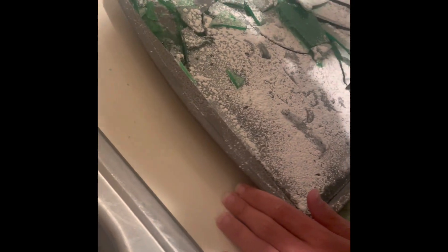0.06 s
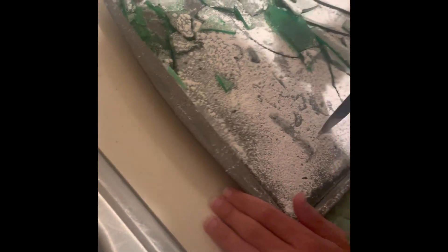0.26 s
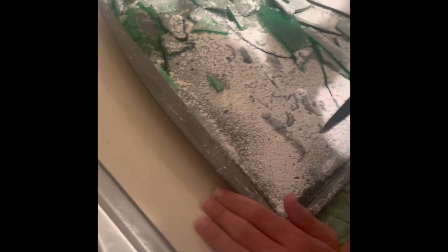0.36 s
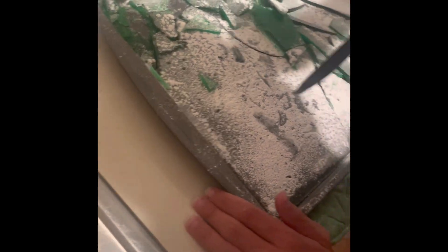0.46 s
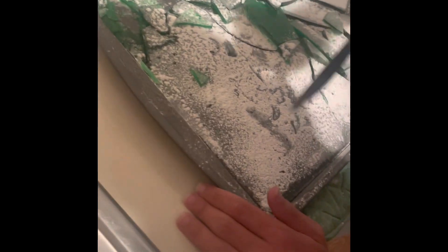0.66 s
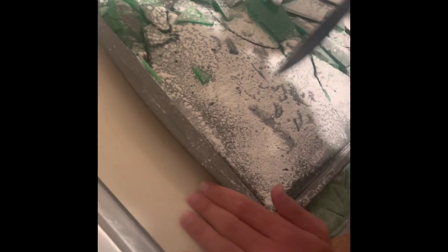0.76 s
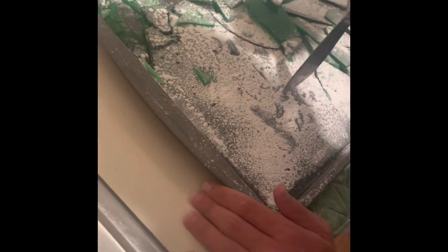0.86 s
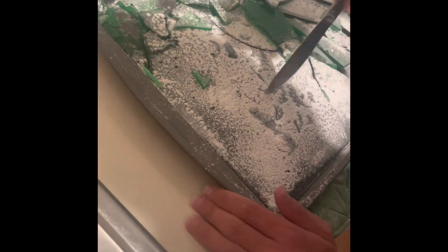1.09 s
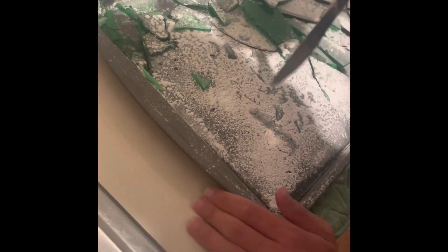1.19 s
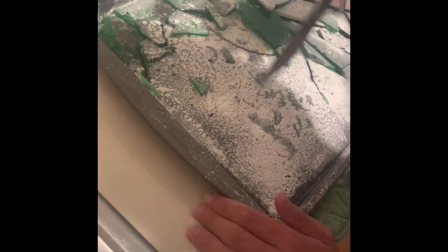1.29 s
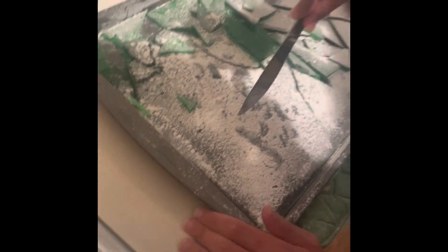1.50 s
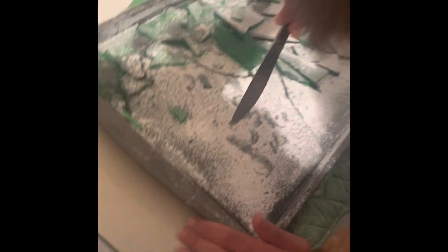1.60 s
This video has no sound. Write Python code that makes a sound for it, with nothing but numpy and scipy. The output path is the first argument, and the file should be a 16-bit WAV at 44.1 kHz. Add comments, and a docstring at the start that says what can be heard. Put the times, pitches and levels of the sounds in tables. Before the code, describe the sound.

A knife tip cracks hard candy in a metal pan with five sharp, crunchy taps

```python
"""A knife tip taps five times on a sheet of hard candy in a metal baking pan, close to a two-port microphone.
Each tap is a set of decaying sine modes (candy, pan, blade) under grainy noise for the crack and the crunch of
shards. The pan drops back on the counter with a low pressure swing, and the counter and tray rumble as noise.
A small kitchen answers with decaying noise, over low rumble, hum lines and faint hiss; a limiter flattens peaks.
"""
import sys
import numpy as np
from scipy import signal
from scipy.fft import rfft, irfft
from scipy.io import wavfile
from scipy.ndimage import uniform_filter1d, minimum_filter1d

SR = 44100
rng = np.random.default_rng(int(sys.argv[2]) if len(sys.argv) > 2 else 0)


def output_pcm(signal):
    """Save a mono or channel-first signal as 16-bit PCM at the path in sys.argv[1].

    Samples are clipped to [-1, 1] before scaling.
    """
    pcm = np.clip(np.atleast_2d(signal).T, -1, 1) * 32767
    wavfile.write(sys.argv[1], SR, np.round(pcm).astype(np.int16))


N = 72765

# Candy mode decays: (low mode t60 [s], main mode t60 [s])
CANDY_T60_S = (0.058, 0.022)
# Pan modes: (frequency [Hz], level [dB], t60 [s])
PAN_MODES = [(952, -11.5, 0.08), (1488, -17, 0.044), (1634, -12, 0.045), (1861, -8, 0.026),
             (2264, -18, 0.15), (3704, -19.5, 0.07), (3943, -5.5, 0.023), (4434, -16.5, 0.075),
             (5442, -18.5, 0.079), (6216, -5.5, 0.078), (9455, -21, 0.11), (10220, -18.5, 0.046)]
# Crack spectrum: (frequency [Hz], density [dB per Hz])
CRACK_SPECTRUM = [(350, -17.5), (750, -29.5), (1120, 2), (1900, -11.5), (2350, 7), (2830, -5.5), (3350, -7),
                  (4100, -18.5), (4750, -6), (5480, -14.5), (6400, -11), (7600, -14.5), (10000, -8.5),
                  (13500, -20), (15600, -15), (16800, -40)]
# Crunch spectrum, also used for loose shards: (frequency [Hz], density [dB per Hz])
CRUNCH_SPECTRUM = [(300, -25), (520, -2), (750, -17.5), (1120, 1.5), (1500, -6.5), (1900, -7.5), (2350, -1),
                   (2830, 1), (3350, -19.5), (3920, -3.5), (4700, -15.5), (5480, -10), (6000, -11),
                   (7700, -36), (10000, -17), (13000, -20), (16800, -43)]
TAP_DB, TAP_RISE_S, LOW_RISE_S = -10.5, 0.0015, 0.008
BLADE_HZ, BLADE_T60_S = 2827, 0.028
CRACK_DB, CRACK_T60_S = -2, 0.035
SCATTER_DB, DETUNE = 2.0, 0.01  # random spread of mode level and relative pitch


def tap(level_db, low_hz, low_db, main_hz, main_db, blade_db, contact_s, treble_db, crunch_db, crunch_t60_s):
    """Candy, pan and blade modes hold while the blade bears on the sheet, then die; crack and crunch lie over."""
    t = np.arange(SR // 4) / SR
    free_t = np.maximum(t - contact_s, 0)
    candy_mode = (main_hz, main_db, CANDY_T60_S[1])
    blade_mode = (BLADE_HZ, blade_db, BLADE_T60_S)
    modes = np.array(PAN_MODES + [candy_mode, blade_mode])
    chance = rng.uniform(-1.03, 1, (len(modes), 3))
    quadrature = np.array([[0], [np.pi / 2]])

    low_env = amp(low_db - 60 * free_t / CANDY_T60_S[0]) * np.minimum(t / LOW_RISE_S, 1) ** 2
    out = low_env * np.sin(2 * np.pi * low_hz * t + quadrature)
    for (hz, db, t60_s), (level_chance, pitch_chance, phase_chance) in zip(modes, chance):
        mode_db = db + treble_db * np.log2(hz / 1000) / 2 + SCATTER_DB * level_chance
        mode_hz = hz * (1 + DETUNE * pitch_chance)
        phase = np.pi * phase_chance + quadrature
        out += amp(mode_db - 60 * free_t / t60_s) * np.sin(2 * np.pi * mode_hz * t + phase)

    out += amp(CRACK_DB + treble_db) * crack(free_t, CRACK_T60_S, CRACK_SPECTRUM)
    out += amp(crunch_db) * crack(t, crunch_t60_s, CRUNCH_SPECTRUM)
    return amp(TAP_DB + level_db) * np.minimum(t / TAP_RISE_S, 1) * out


GRAINS_PER_S, SPREAD_DB = 5000, 3


def crack(t, t60_s, spectrum):
    """A dense random spray of tiny fractures, of uneven size, gates coloured noise that dies away."""
    size = amp(SPREAD_DB * np.minimum(rng.exponential(1, len(t)), 4))
    grains = size * (rng.random(len(t)) < GRAINS_PER_S / SR)
    density = evened(uniform_filter1d(grains, size=40) + 0.02)
    return amp(-60 * t / t60_s) * density * noise(spectrum, len(t))


# Loose shards and crumbs: (time [s], level [dB], rise [s], t60 [s])
SHARDS = [(0.271, -31.5, 0.018, 0.15), (.5245, -14, .001, .03), (.797, -23, 0.00048, 0.017),
          (0.803, -23.5, 0.00067, 0.059), (.83, -33.5, 0.017, 0.077), (1.070, -27, 0.0039, .03),
          (1.309, -24, 0.0064, 0.025), (1.321, -29, 0.0012, 0.032), (1.469, -48, 0.012, .1)]


def add_shards(mix):
    """Each loose shard is a short crunch: linear rise, then exponential decay."""
    t = np.arange(SR // 8) / SR
    for s, db, rise_s, t60_s in SHARDS:
        grit = crack(np.maximum(t - rise_s, 0), t60_s, CRUNCH_SPECTRUM)
        add(mix, s, amp(db) * np.minimum(t / rise_s, 1) * grit)


THUD_HALF_S = 0.05


def thud(level_db, hz, length_s):
    """A few swings of low pressure under a bell, centred on the landing, with no net push."""
    t = np.arange(-THUD_HALF_S, THUD_HALF_S, 1 / SR)
    bell = np.exp(-0.5 * (t / length_s) ** 2)
    offset = np.exp(-0.5 * (2 * np.pi * hz * length_s) ** 2)
    return -amp(level_db) * bell * (np.cos(2 * np.pi * hz * t) - offset)


# Counter spectrum: (frequency [Hz], density [dB per Hz])
COUNTER_SPECTRUM = [(35, -10), (60, 8), (90, -1.5), (130, 5), (170, -1.5), (230, -2.5), (300, -7.5),
                    (450, -30)]
# Close tray tones: (lower [Hz], upper [Hz])
TRAY_HZ = (205, 230.3)
BOOM_RISE_S, BOOM_T60_S, TRAY_T60_S = 0.04, 0.63, 0.74


def boom(counter_db, tray_db):
    """Counter swells after the tap and rumbles on as low noise; tray hums in two narrow noise bands."""
    t = np.arange(SR // 2) / SR
    tray = sum(noise([(hz - 10, -14), (hz, 0), (hz + 10, -14)], len(t)) for hz in TRAY_HZ)
    counter = amp(counter_db - 60 * t / BOOM_T60_S) * noise(COUNTER_SPECTRUM, len(t))
    both = counter + amp(tray_db - 60 * t / TRAY_T60_S) * tray
    return np.minimum(t / BOOM_RISE_S, 1) ** 2 * both


# Room decay before each tap's span factor: (frequency [Hz], t60 [s])
ROOM_DECAY = [(300, 0.57), (700, 0.38), (1800, 0.5), (2830, 0.43), (4800, 0.34), (9000, 0.35),
              (15000, 0.14)]
# Room spectrum: (frequency [Hz], density [dB per Hz])
ROOM_SPECTRUM = [(180, -31), (300, -7), (730, -7.5), (1530, -15), (2170, -17.5), (2840, -21.5), (3530, -15),
                 (6140, -13.5), (7020, -35), (7890, -92), (8300, -24), (11400, -22), (13000, -37.5),
                 (13700, -82.5), (16500, -71.5)]
# Lingering pan ring, t60 before the span factor: (frequency [Hz], width [Hz], level [dB], t60 [s])
PAN_RING = [(1160, 80, -19, 0.46), (1890, 100, -17.5, .4), (2850, 140, -4.5, 0.39), (3864, 120, -16, .45),
            (4350, 120, -21, 0.18), (5520, 120, -17, 0.37), (6470, 150, -17, .4)]
PATCH_DB, ROOM_RISE_S = 3.0, 0.0082


def room_tail(room_db, span, extra_ring_db):
    """Two patchy noise tails, each band dying at its own speed, with the pan ringing on unsteadily."""
    hz, t, bins = signal.stft(noise(ROOM_SPECTRUM, SR // 2), SR, nperseg=256)
    patches = uniform_filter1d(rng.standard_normal(bins.shape[1:]), size=4, axis=0)
    patches = evened(uniform_filter1d(patches, size=5, axis=1))
    decay_db = -60 * t / (span * read(ROOM_DECAY, hz)[:, None])
    tail = signal.istft(bins * amp(PATCH_DB * patches + decay_db), SR, nperseg=256)[1]

    t = np.arange(tail.shape[1]) / SR
    for ring_hz, width_hz, ring_db, t60_s in PAN_RING:
        band = [(ring_hz - 2 * width_hz, -20), (ring_hz, 0), (ring_hz + 2 * width_hz, -20)]
        tail = tail + amp(ring_db + extra_ring_db - 60 * t / (span * t60_s)) * noise(band, len(t))
    return amp(room_db) * tail * np.minimum(t / ROOM_RISE_S, 1)


# Rumble spectrum: (frequency [Hz], density [dB per Hz])
RUMBLE_SPECTRUM = [(20, -21), (50, -8.5), (110, 1.5), (160, -7), (300, -16), (500, -19.5), (1000, -30.5),
                   (2000, -43.5), (4000, -54)]
# Hum lines, before the port tilt: (frequency [Hz], level [dB rms])
HUM_LINES = [(118.4, -64.5), (204.6, -63), (279.9, -61.5)]
# Treble hiss spectrum: (frequency [Hz], density [dB per Hz])
HISS_SPECTRUM = [(880, -71.5), (1500, -36), (2700, -17), (3750, -30), (4520, -21), (6950, -33),
                 (7490, -43.5), (12300, -34), (14000, -62.5)]
# Hiss level: (time [s], level [dB])
HISS_LEVEL = [(0, -100), (.2, -60), (.3, -70.5), (.7, -63.5), (1., -66), (1.3, -54), (1.65, -60.5)]
RUMBLE_DB = -53.5


def kitchen():
    """Low noise rumble, steady hum sines and a faint hiss of varying level."""
    t = np.arange(N) / SR
    hum = sum(amp(db) * np.sqrt(2) * np.sin(2 * np.pi * hz * t) for hz, db in HUM_LINES)
    hiss = amp(np.interp(t, *np.transpose(HISS_LEVEL))) * noise(HISS_SPECTRUM, N)
    rumble = amp(RUMBLE_DB) * noise(RUMBLE_SPECTRUM, N)
    return rumble + hiss + hum * [[1], [0]]  # hum feeds the first signal only


def amp(db):
    """Decibels to amplitude ratio."""
    return 10 ** (np.asarray(db) / 20)


def evened(x):
    """Scale to rms 1."""
    return x / np.sqrt(np.mean(x ** 2) + 1e-20)


def read(points, hz):
    """Interpolate a table over log frequency."""
    point_hz, value = np.transpose(points)
    return np.interp(np.log(hz + 1), np.log(point_hz + 1), value)


def add(mix, s, sound):
    """Mix a sound in at s seconds, cut at the end of the mix."""
    part = mix[..., round(s * SR):][..., :sound.shape[-1]]
    part += sound[..., :part.shape[-1]]


def noise(spectrum, size):
    """Two unrelated noises with the given spectrum, silent outside its end points, rms 1."""
    hz = np.fft.rfftfreq(size, 1 / SR)
    in_band = (hz >= spectrum[0][0]) & (hz <= spectrum[-1][0])
    white = rfft(rng.standard_normal((2, size)))
    return evened(irfft(white * amp(read(spectrum, hz)) * in_band, size))


# Phase by which the left port leads: (frequency [Hz], lead [rad])
PORT_LEAD = [(700, 2.36), (1550, -.5), (2500, 3.15), (3200, -1.9), (4000, 2), (4800, -2.8), (6700, 5.5),
             (8000, 2.5), (9800, 8.5), (11200, 4.5), (12200, 5.5), (14200, 17), (16500, 3)]
# Left minus right level: (frequency [Hz], difference [dB])
PORT_TILT = [(60, .4), (180, 1.9), (350, 3.1), (700, 7.9), (1400, 6.5), (2800, 1.9), (5600, .2), (10000, 0),
             (14000, -.8)]


def ports(pair, likeness):
    """Left port hears the first signal; right a likeness of it, phase-shifted and at another level."""
    hz = np.fft.rfftfreq(N, 1 / SR)
    first, second = rfft(pair, N)
    same = np.clip(read(likeness, hz), 0, 1)
    half_tilt = amp(read(PORT_TILT, hz) / 2)
    lead_hz, lead_rad = np.transpose([(0, 0), (250, 0)] + PORT_LEAD)
    shift = np.exp(-1j * np.interp(hz, lead_hz, lead_rad))
    right = (same * first + np.sqrt(1 - same ** 2) * second) * shift
    return irfft(np.array([first * half_tilt, right / half_tilt]), N)


# Taps: (time [s], level [dB], low candy mode [Hz], its level [dB], main candy mode [Hz], its level [dB],
#        blade mode [dB], blade contact [s], treble [dB], crunch [dB], crunch t60 [s],
#        room [dB], tail span [share of room t60], extra lingering ring [dB])
TAPS = [(0.209, 0, 466, -1, 1061, -3.5, -10.5, 0.0043, 1.5, -3, 0.17, -27, 1., 1.5),
        (0.5105, -5, 466, 3.5, 1159, 4.5, -3.5, 0.0043, 6, -9.5, 0.26, -23.5, 0.69, 3.5),
        (0.7801, 0.5, 518, -9.5, 1115, -3, 1, 0.0037, -4.5, -15, 0.27, -23.5, 0.86, -3.5),
        (1.0481, 1.5, 529, -14.5, 1106, -5.5, -3, 0.0046, -4.5, -8.5, 0.17, -31, 1., -2.5),
        (1.2918, -2, 519, -3, 1128, 1.5, -2.5, 0.003, 3, -6, 0.15, -30.5, 1., 0.5)]
# Pan drops: (time [s], thud level [dB], frequency [Hz], length [s], counter boom [dB], tray hum [dB])
PAN_DROPS = [(0.2413, -16.5, 76.6, 0.0082, -27, -34.5), (0.543, -20.5, 66.5, 0.0079, -28.5, -45.5),
             (.8140, -10.5, 82, 0.005, -23.5, -32), (1.087, -18, 75.2, 0.0044, -30.5, -42),
             (1.333, -22, 74, 0.0076, -31, -47.5)]
# Port likeness of close sounds: (frequency [Hz], likeness [0-1])
NEAR_LIKENESS = [(60, .999), (300, 1), (700, 0.6), (2500, 0.49), (5000, 0.47), (10000, 1), (16000, 0.31)]
# Port likeness of room, booms and background: (frequency [Hz], likeness [0-1])
FAR_LIKENESS = [(60, 0.99), (150, 1), (300, 0.89), (600, 0.45), (2000, 0.24), (5000, 0.67), (10000, 0.46),
                (16000, .9)]


def scene():
    """Place taps, room tails, pan drops and shards; pass near and far sound to the two ports."""
    near, far = np.zeros((2, N)), kitchen()
    for tap_row, drop_row in zip(TAPS, PAN_DROPS):
        s, *tap_settings, room_db, span, extra_ring_db = tap_row
        land_s, thud_db, hz, length_s, counter_db, tray_db = drop_row
        add(near, s, tap(*tap_settings))
        add(far, s, room_tail(room_db, span, extra_ring_db))
        add(near[0], land_s - THUD_HALF_S, thud(thud_db, hz, length_s))
        add(far, s, boom(counter_db, tray_db))  # starts at the tap
    add_shards(near)
    return ports(near, NEAR_LIKENESS) + ports(far, FAR_LIKENESS)


CEILING, EDGE_HZ = 0.91, 16900


def record(dry):
    """Limiter with one gain for both ports holds peaks under the ceiling; then a low-pass."""
    need = np.minimum(1, CEILING / (abs(dry).max(0) + 1e-9))
    gain = uniform_filter1d(minimum_filter1d(need, size=61), size=31)
    lowpass = signal.firwin(511, EDGE_HZ, window=("kaiser", 9), fs=SR)
    return signal.oaconvolve(dry * gain, lowpass[None], "same")


dry = scene()
out = record(dry)
output_pcm(out)
```